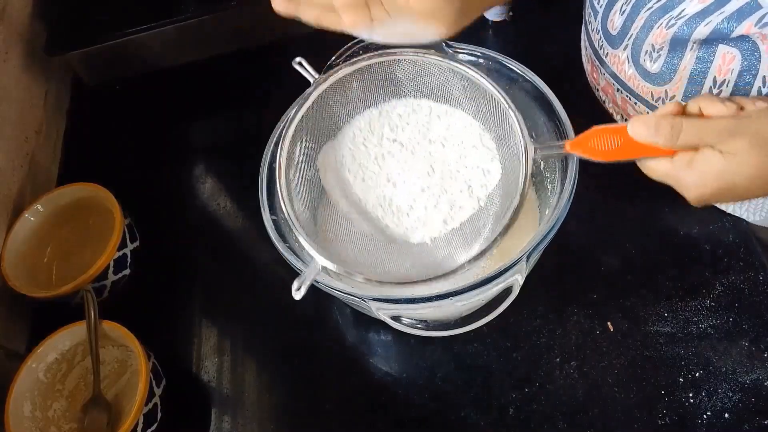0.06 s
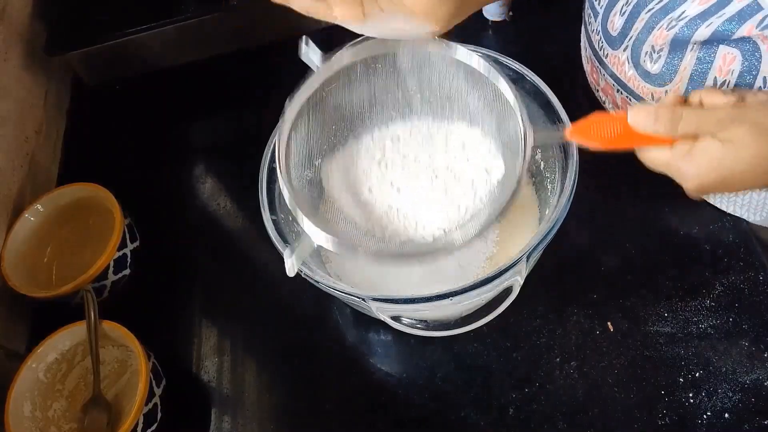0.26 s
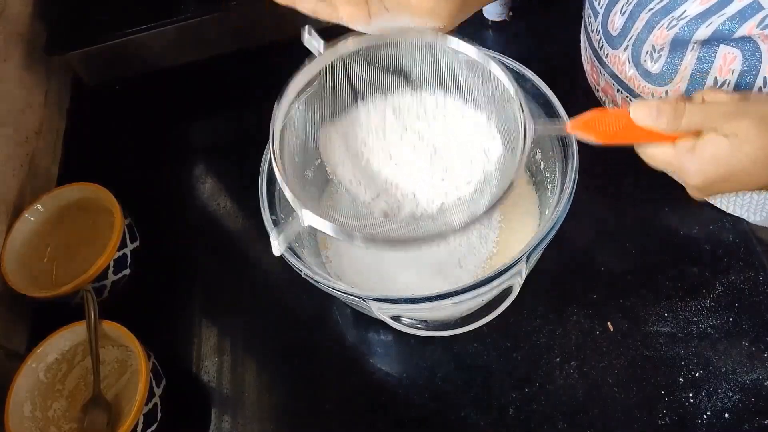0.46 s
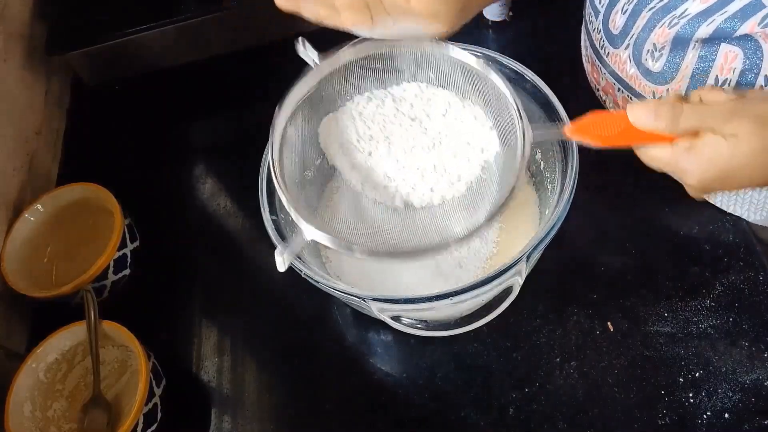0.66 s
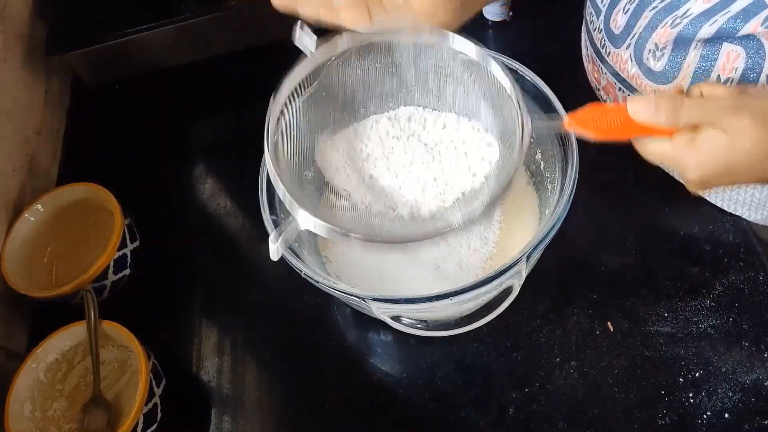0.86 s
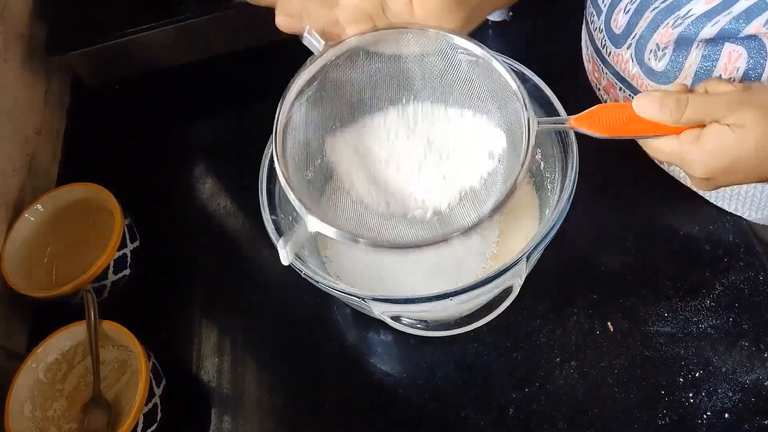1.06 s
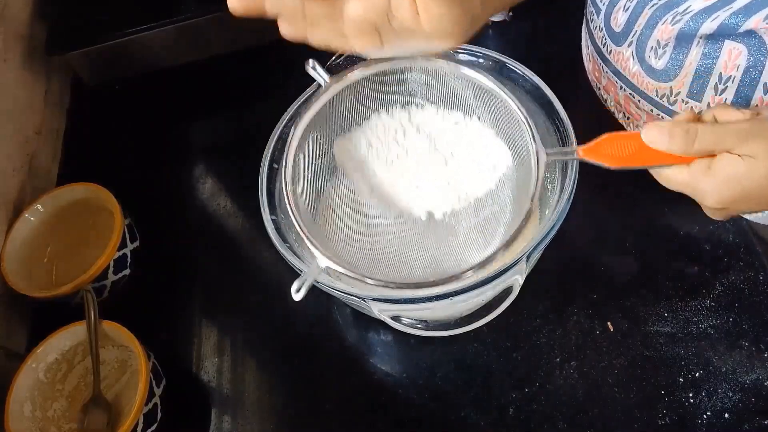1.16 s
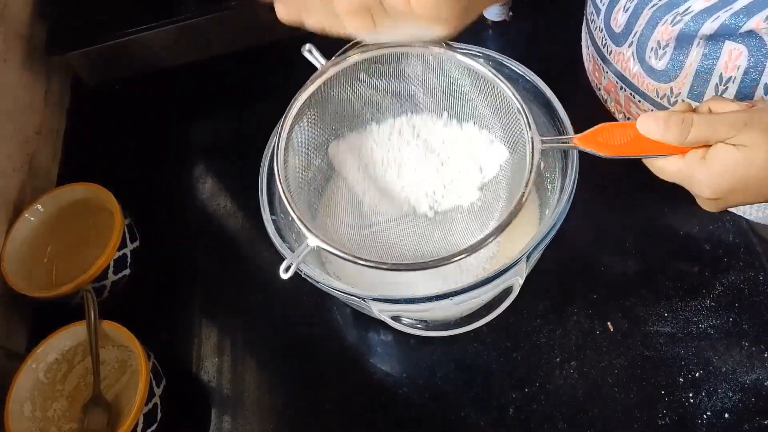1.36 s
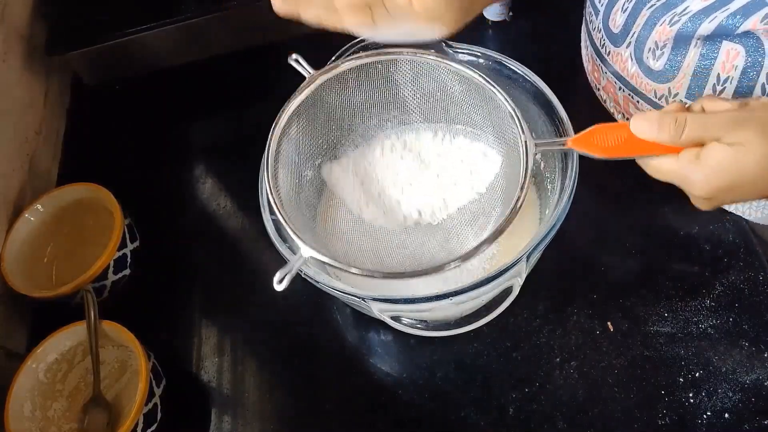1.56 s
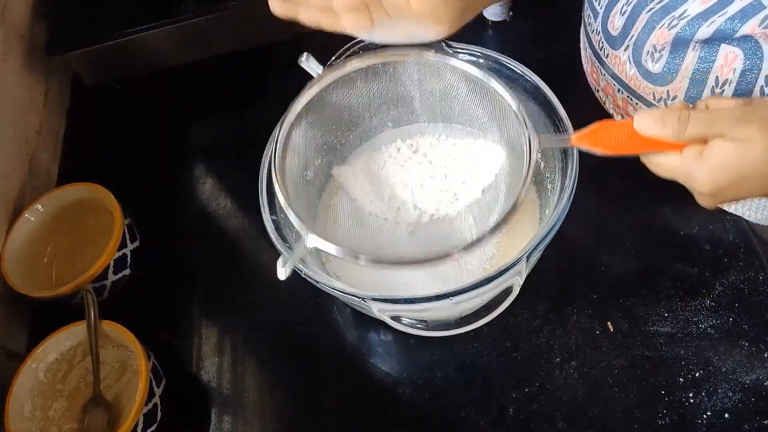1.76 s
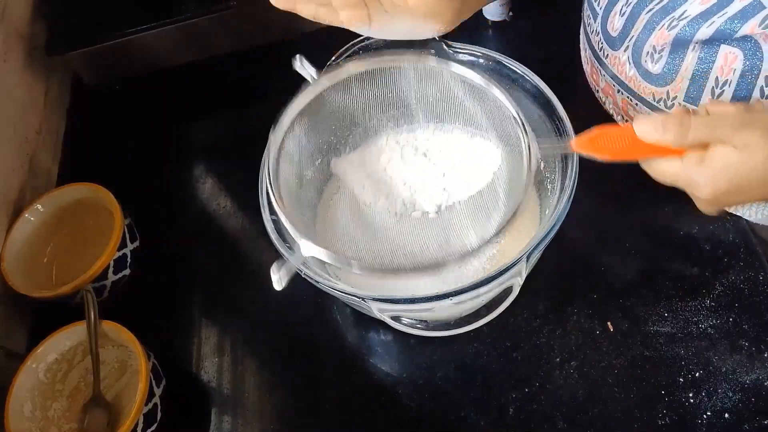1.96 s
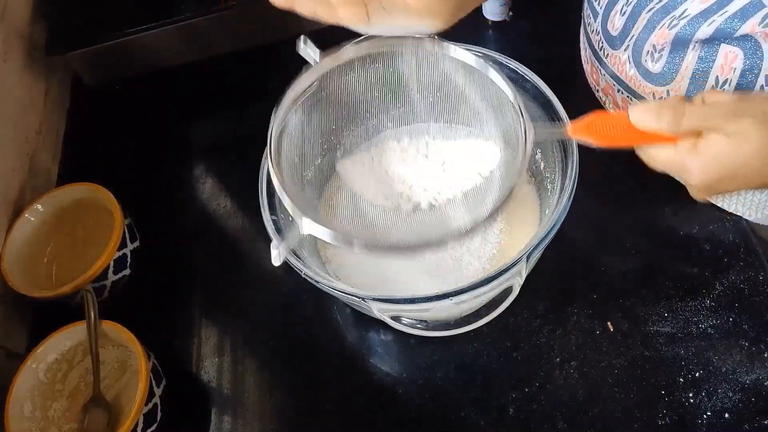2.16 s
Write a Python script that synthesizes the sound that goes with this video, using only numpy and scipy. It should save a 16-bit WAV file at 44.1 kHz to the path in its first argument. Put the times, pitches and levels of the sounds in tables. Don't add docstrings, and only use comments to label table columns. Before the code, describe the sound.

Flour sifted through a wire sieve in short bright hisses, with one steel clink on glass

```python
import sys
import numpy as np
from scipy import signal
from scipy.fft import rfft, irfft
from scipy.io import wavfile
from scipy.ndimage import uniform_filter1d

SR = 44100
rng = np.random.default_rng(int(sys.argv[2]) if len(sys.argv) > 2 else 0)


def wav_record(signal):
    frames = np.transpose(np.atleast_2d(signal))
    bounded = np.clip(frames, -1, 1)
    quanta = np.round(bounded * 32767).astype(np.int16)
    wavfile.write(sys.argv[1], SR, quanta)


def voltage_ratio(decibels):
    exponent = np.asarray(decibels, float) / 20
    return 10 ** exponent


N = 97020
TIME = np.arange(N) / SR


def rms_one(x):
    return x / np.sqrt(np.mean(x ** 2) + 1e-20)


def noise():
    return rng.standard_normal(N)


def drift(rate_hz):
    r = np.exp(-2 * np.pi * rate_hz / SR)
    slow = signal.lfilter([1], [1, -2 * r, r * r], rng.standard_normal(N + SR))
    return rms_one(slow[SR:])


def ring(push, pitch_hz, t60_s):
    r = voltage_ratio(-60 / (t60_s * SR))
    w = 2 * np.pi * pitch_hz / SR
    return signal.lfilter([0, np.sin(w)], [1, -2 * r * np.cos(w), r * r], push + 1e-18)


def colour(x, spectrum):
    hz, db = np.transpose(spectrum)
    grid = np.maximum(np.arange(4097) * SR / 8192, 1)
    cepstrum = irfft(np.log(voltage_ratio(np.interp(np.log(grid), np.log(hz), db))))
    cepstrum[1:4096] *= 2
    cepstrum[4097:] = 0
    pulse = irfft(np.exp(rfft(cepstrum)))
    pulse = pulse / np.sqrt(np.sum(pulse ** 2))
    return signal.fftconvolve(x, pulse)[:N]


def grains(per_s, spread_db):
    sizes = voltage_ratio(spread_db * np.minimum(rng.exponential(1, N), 4.5)) * rng.choice([-1, 1], N)
    return rms_one(sizes * (rng.random(N) < per_s / SR))


# start_s (of full flow), level_db, rise_s, hold_s, fall_s
FLOUR_THROWS = [(0.027, -37.5, 0.043, 0.0032, .03), (0.079, -46.5, .003, .003, .015),
                (0.188, -36.5, 0.019, 0.03, 0.044), (0.366, -33.5, .02, 0.0134, 0.0099),
                (0.534, -55, 0.0034, 0.0088, 0.055), (0.592, -61, 0.031, 0.032, 0.038),
                (0.769, -39.5, 0.013, 0.025, 0.018), (0.932, -34.5, 0.015, 0.047, 0.021),
                (1.121, -41.5, 0.021, 0.0085, 0.014), (1.156, -46.5, 0.0052, .005, 0.024),
                (1.333, -36.5, 0.023, 0.02, 0.017), (1.512, -41.5, 0.019, .02, .03),
                (1.533, -37, 0.014, 0.0033, 0.033), (1.687, -39, 0.012, 0.036, 0.023),
                (1.882, -46, 0.017, 0.018, 0.036), (1.954, -61, .03, 0.02, 0.026),
                (2.076, -38, 0.021, .033, 0.022)]
# pitch_hz, level_db (per Hz)
FLOUR_SPECTRUM = [(500, -29.5), (2700, -25), (3900, -13), (5500, -10), (6480, 2), (7250, -6), (8000, -30),
                  (16500, -44)]
EDGE_DB = 17
TRICKLE_DB, TRICKLE_S = -22.5, 0.03
CLUMP_DB = -1.5


def flour():
    power = 1e-12
    for start, level_db, rise, hold, fall in FLOUR_THROWS:
        before = np.maximum((start - TIME) / rise, 0)
        after = np.maximum((TIME - start - hold) / fall, 0)
        power = power + voltage_ratio(2 * (level_db - EDGE_DB * (before + after)))
        trickle = np.exp(-np.abs(TIME - start) / TRICKLE_S) * (TIME > start)
        power = power + voltage_ratio(2 * (level_db + TRICKLE_DB)) * trickle
    flow = np.sqrt(power) * voltage_ratio(CLUMP_DB * drift(150))
    return colour(flow * grains(per_s=9000, spread_db=3.5), FLOUR_SPECTRUM)


# start_s, level_db, pitch_hz
PALM_THUDS = [(.03, -54, 203), (.285, -48.5, 110), (0.431, -55, 311), (0.778, -68, 204),
              (0.962, -52.5, 153.5), (1.141, -55.5, 227.6), (1.346, -52, 293), (1.549, -63, 172),
              (1.709, -53.5, 150), (1.9, -55.5, 123.4), (2.1, -54, 282)]
THUD_RISE_S, THUD_CYCLES = 0.01, 18


def palm():
    out = np.zeros(N)
    for start, level_db, pitch_hz in PALM_THUDS:
        t = TIME - start
        push = np.exp(-(t / THUD_RISE_S) ** 2) * np.sin(2 * np.pi * pitch_hz * t)
        thud = ring(push, pitch_hz, THUD_CYCLES / pitch_hz)
        out += voltage_ratio(level_db + 3) * thud / np.abs(thud).max()
    return out


# pitch_hz, level_db (per Hz)
RUMBLE_SPECTRUM = [(20, -44), (50, -30.5), (80, 2), (122, -0.5), (350, -2.5), (480, -15), (900, -9.5),
                   (1300, -40)]


def hum():
    return voltage_ratio(-60.5 + 1.5 * drift(7.2)) * colour(noise(), RUMBLE_SPECTRUM)


# pitch_hz, level_db (per Hz)
AIR_SPECTRUM = [(300, -6.5), (700, 1), (2400, -6), (5200, -9.5), (6400, -1), (7300, -20.5), (8500, -30),
                (16500, -23.5)]


def room_air():
    return voltage_ratio(-62 + 1.8 * drift(13)) * colour(noise(), AIR_SPECTRUM)


# pitch_hz, level_db, t60_s
BOWL_TONES = [(350, -30, .05), (1230, -18, .015), (2050, -22, .025), (4660, -24, .15), (6150, -9, .03),
              (6550, -5, .07), (6670, -9, .12), (6990, -2, .035), (8140, -24, .04), (640, -20, .03),
              (1735, -16, .045), (3095, -10, .05), (5812, -3, .065), (13200, -25, .025)]
CLINK_S, CLINK_DB, CONTACT_S = .2482, -9.5, .0002
SINCE_CLINK = np.maximum(TIME - CLINK_S, 0)


def clink():
    strike = np.zeros(N)
    strike[int(CLINK_S * SR)] = voltage_ratio(CLINK_DB)
    struck = sum(voltage_ratio(db) * ring(strike, hz, t60 * 0.72) for hz, db, t60 in BOWL_TONES)
    return struck * (1 - np.exp(-SINCE_CLINK / CONTACT_S)) ** 2


# start_s, level_db
CHATTER_FORCE = [
    (0.249, -14.5),
    (.274, -24),
    (0.288, -21),
    (0.337, -27),
    (0.346, -29.5),
    (0.374, -40),
    (0.404, -50),
    (0.501, -81),
]


def chatter_force():
    s, db = np.transpose(CHATTER_FORCE)
    return voltage_ratio(np.interp(TIME, s, db, right=-120)) * np.clip(SINCE_CLINK / 0.00098, 0, 1)


RIM_LEAVES_S, RING_FADE_S = .378, .02


def chatter():
    touches = grains(per_s=2500, spread_db=7.2)
    rattle = np.zeros(N)
    for k, (hz, db, t60) in enumerate(BOWL_TONES):
        rattle += voltage_ratio(db) * ring(np.roll(touches, 997 * k), hz, t60 * 1.1)
    fade = np.exp(-np.maximum(TIME - RIM_LEAVES_S, 0) / RING_FADE_S)
    return voltage_ratio(-0.76) * chatter_force() * rms_one(rattle) * fade


# pitch_hz, level_db (per Hz)
SCRAPE_SPECTRUM = [(100, -25.5), (900, -38.5), (1800, -13.5), (3600, -30), (5400, -15), (7000, -2.5),
                   (8700, -33), (16500, -36)]
CRACK_DB, CRACK_S, SCRAPE_DB = -13.5, 0.0028, -4.5
TOP_HZ = 8140
TOP_ENDS_S, TOP_LOSS_DB = .338, -10.0


def scrape():
    crack = voltage_ratio(CRACK_DB) * np.exp(-SINCE_CLINK / CRACK_S) * np.clip(SINCE_CLINK / CONTACT_S / 4, 0, 1)
    hiss = colour((crack + chatter_force() * voltage_ratio(SCRAPE_DB)) * noise(), SCRAPE_SPECTRUM)
    top = signal.sosfilt(signal.butter(4, TOP_HZ, "high", fs=SR, output="sos"), hiss)
    duller = np.clip((TIME - TOP_ENDS_S) / 0.007, 0, 1)
    return hiss - top * (1 - voltage_ratio(TOP_LOSS_DB)) * duller


def kitchen(x):
    t = np.arange(SR // 2) / SR
    tail = rng.standard_normal(len(t)) * voltage_ratio(-60 * t / 0.21) * (t > .006)
    return signal.fftconvolve(x, tail / np.sqrt(np.sum(tail ** 2)))[:N]


# middle_s, step_ratio (step size over the local level)
THIN_MOMENTS = [(.005, 2.5), (.112, 2.0), (.133, 3.8), (.155, 2.5), (.197, 3.5), (.346, 2.2), (.538, 3.2),
                (.581, 3.5), (.602, 2.0), (.709, 3.8), (.73, 2.0), (.858, 3.5), (.88, 1.8), (.901, 4.0),
                (1.008, 2.8), (1.157, 3.5), (1.178, 2.2), (1.2, 2.2), (1.328, 3.5), (1.37, 3.2),
                (1.413, 2.2), (1.456, 3.5), (1.477, 2.0), (1.52, 3.5), (1.882, 3.2), (1.925, 3.2),
                (1.968, 2.8), (2.117, 3.5), (2.138, 2.5), (2.181, 3.2)]
# pitch_hz, step_share (0 = spared)
THINNING = [(300, .1), (1100, .7), (1600, 1.0), (5300, 1.0), (6500, .5), (7500, .8), (8500, 1.6)]
HOP = 941
TOP_STEP_DB, LAST_HZ = -58, 15700
LEAK_DB = -18.0


def thin_out(x):
    n, k = np.arange(2 * HOP), np.arange(HOP)
    window = np.sin(np.pi / 2 * np.sin(np.pi * (n + .5) / (2 * HOP)) ** 2)
    basis = np.cos(np.pi / HOP * np.outer(k + .5, n + .5 + HOP / 2)) * window
    hz = (k + .5) * SR / (2 * HOP)
    below_top = hz < TOP_HZ

    first = int(THIN_MOMENTS[0][0] * SR)
    out = np.pad(x, (2 * HOP - first, 3 * HOP))
    starts = np.arange(0, len(out) - 2 * HOP, HOP)
    tones = out[starts[:, None] + n] @ basis.T
    coarse = np.zeros((len(starts), 1))
    for s, step_ratio in THIN_MOMENTS:
        coarse[round((s * SR - first) / HOP) + 1] = step_ratio

    local = uniform_filter1d(tones ** 2, size=52, axis=1) + 1e-20
    step = coarse * np.interp(hz, *np.transpose(THINNING)) * np.sqrt(local)
    step = np.maximum(step, voltage_ratio(TOP_STEP_DB) * (hz > TOP_HZ)) + 1e-9
    kept = np.sign(tones) * step * np.floor(np.abs(tones) / step + .4) * (hz < LAST_HZ)

    lost = local / (uniform_filter1d(kept ** 2, size=52, axis=1) + local / 8)
    louder = kept * lost ** (0.5 * (coarse > 0) * below_top)
    leak = voltage_ratio(LEAK_DB) * tones * (kept == 0) * below_top
    change = (louder + leak - tones) @ basis * 2 / HOP
    for i, part in zip(starts, change):
        out[i:i + 2 * HOP] += part
    return out[2 * HOP - first:][:N]


def scene():
    near = flour() + palm() + clink() + chatter() + scrape()
    background = hum() + room_air()
    return (near + voltage_ratio(-13) * kitchen(near) + background)[None]


def top_cut(x):
    return signal.sosfilt(signal.butter(12, 16830, fs=SR, output="sos"), x)


def record(dry):
    lean = signal.sosfilt(signal.butter(2, 60, "high", fs=SR, output="sos"), dry[0])
    mix = signal.sosfilt(signal.cheby2(10, 60, 17200, fs=SR, output="sos"), thin_out(lean))
    return top_cut(mix[None])


dry = scene()
out = record(dry)
wav_record(out)
```